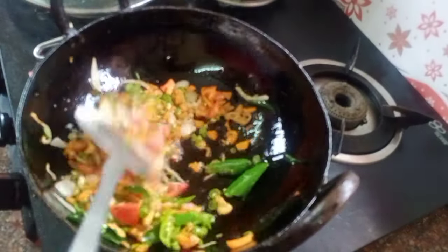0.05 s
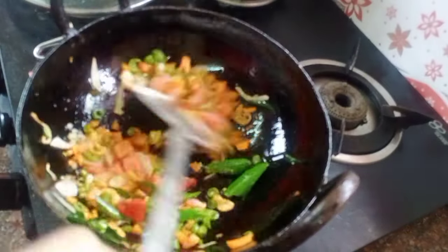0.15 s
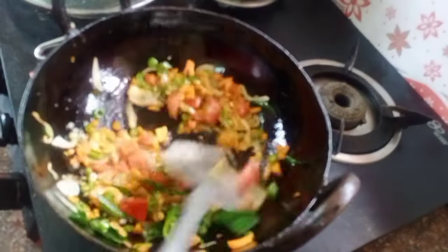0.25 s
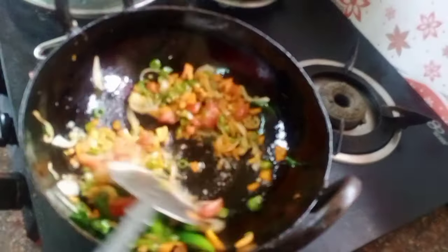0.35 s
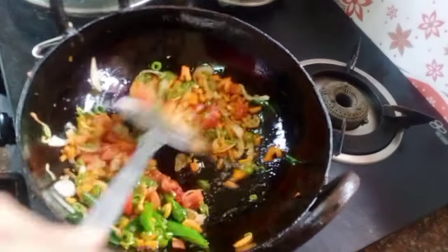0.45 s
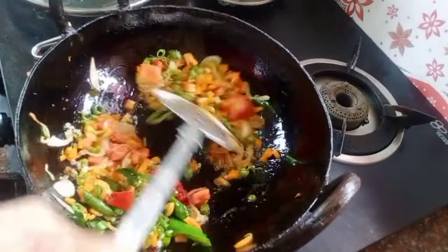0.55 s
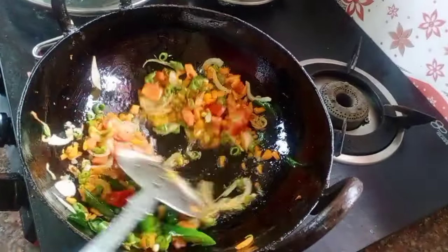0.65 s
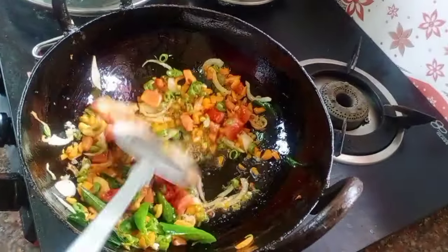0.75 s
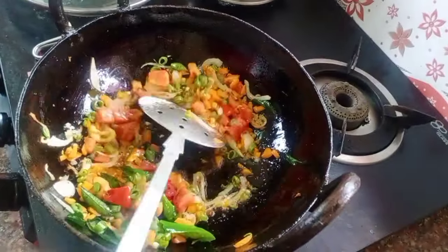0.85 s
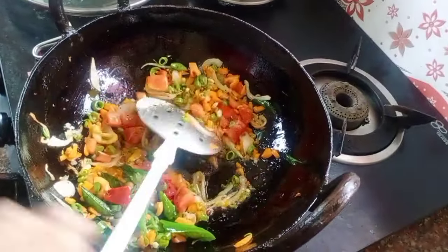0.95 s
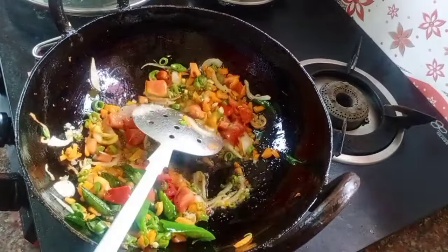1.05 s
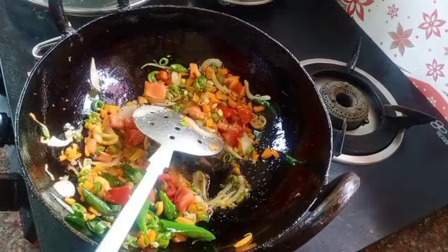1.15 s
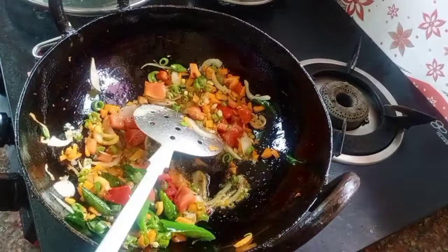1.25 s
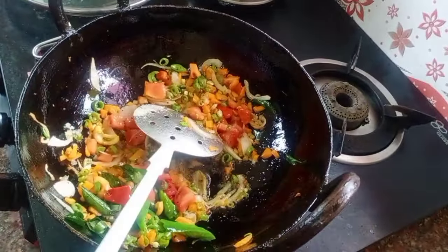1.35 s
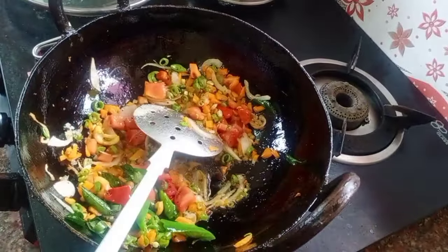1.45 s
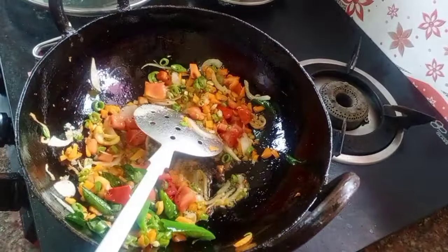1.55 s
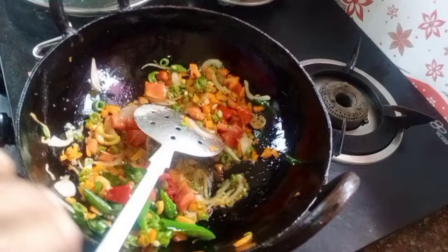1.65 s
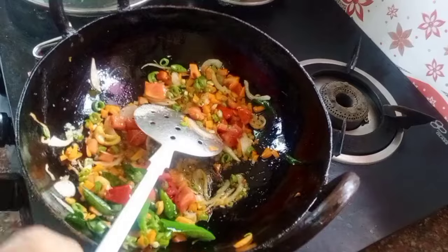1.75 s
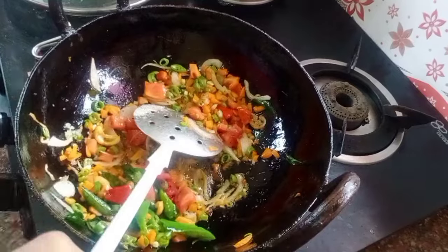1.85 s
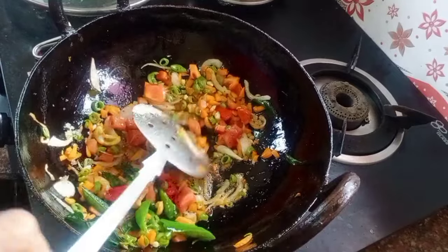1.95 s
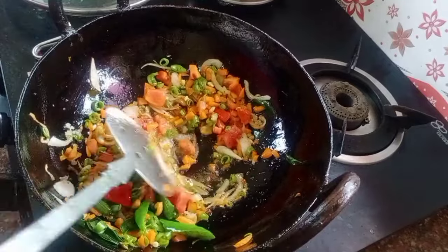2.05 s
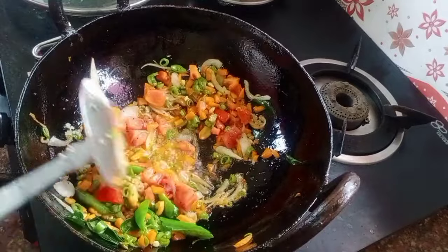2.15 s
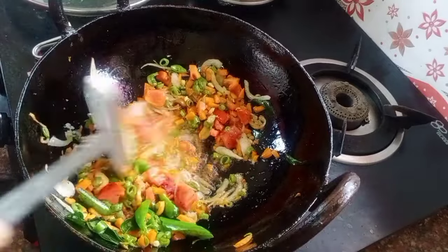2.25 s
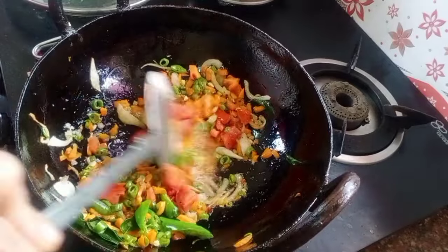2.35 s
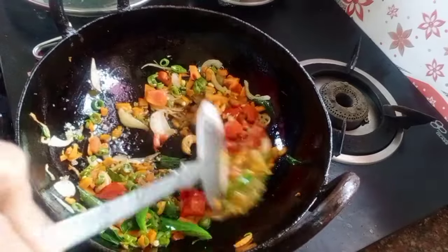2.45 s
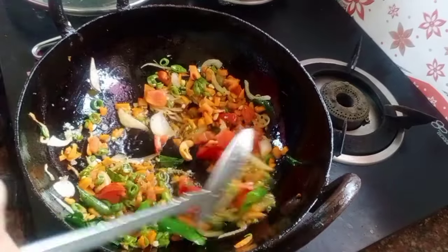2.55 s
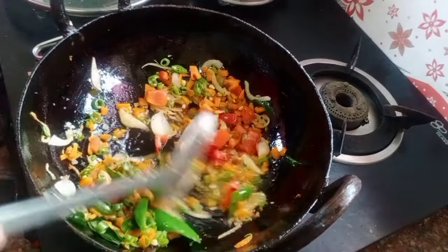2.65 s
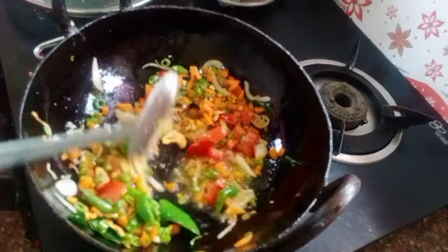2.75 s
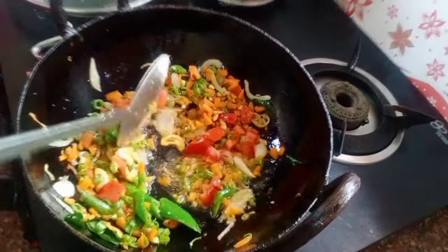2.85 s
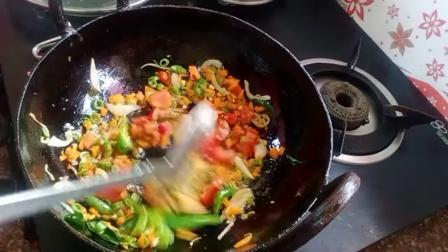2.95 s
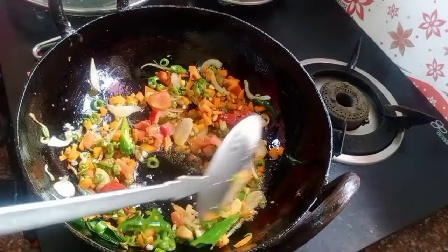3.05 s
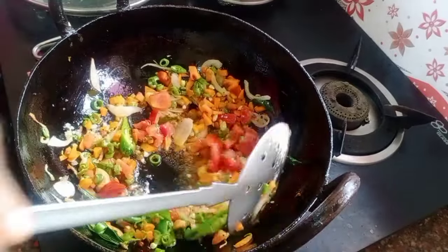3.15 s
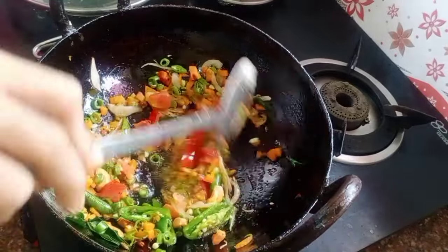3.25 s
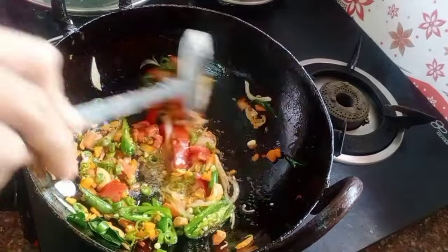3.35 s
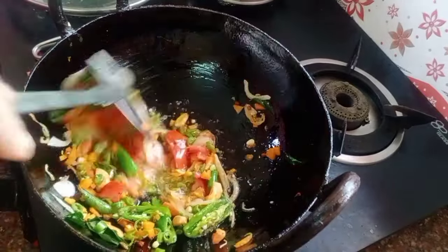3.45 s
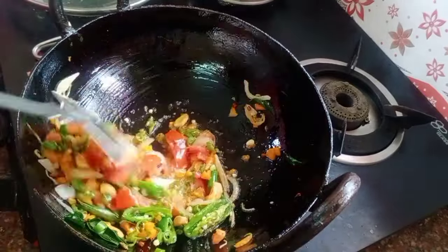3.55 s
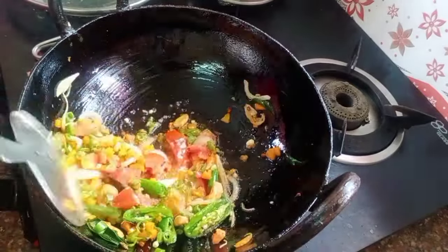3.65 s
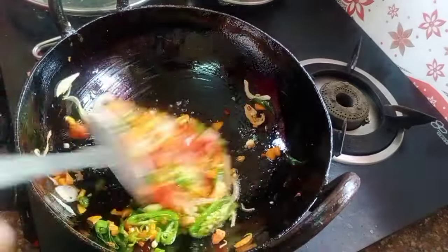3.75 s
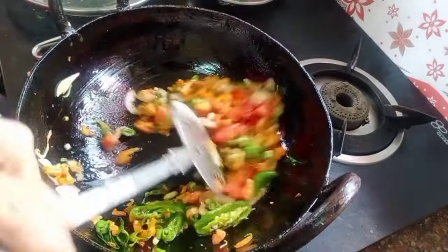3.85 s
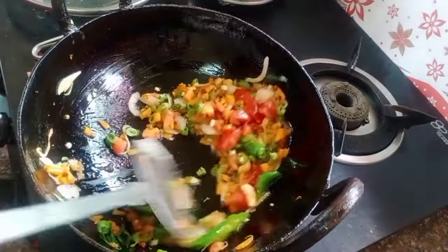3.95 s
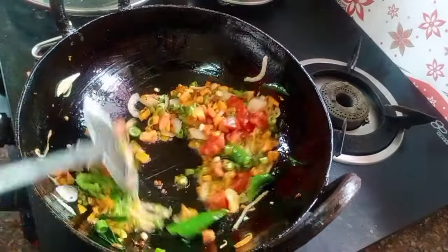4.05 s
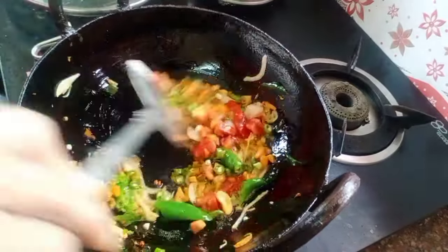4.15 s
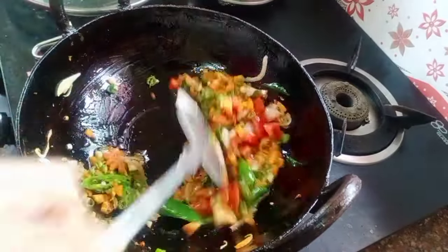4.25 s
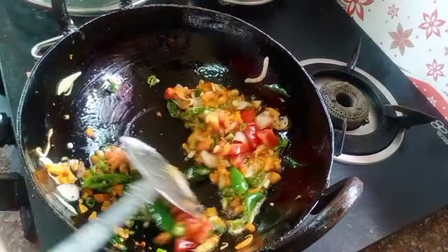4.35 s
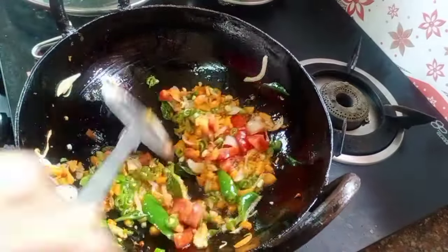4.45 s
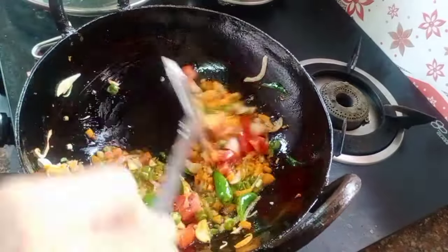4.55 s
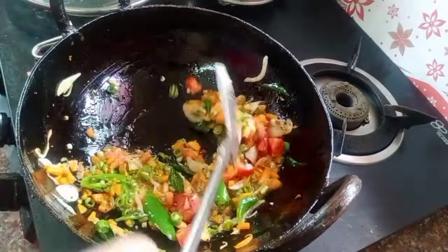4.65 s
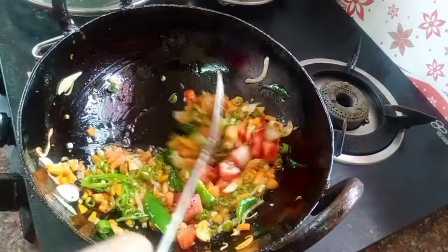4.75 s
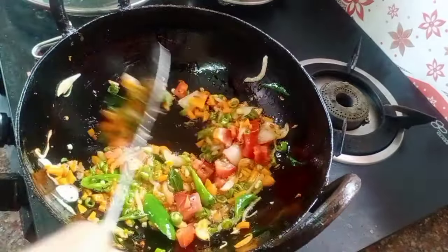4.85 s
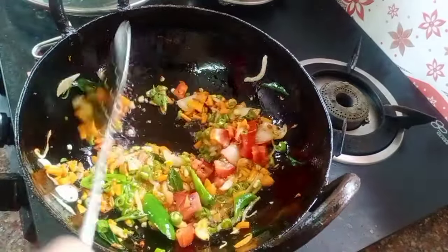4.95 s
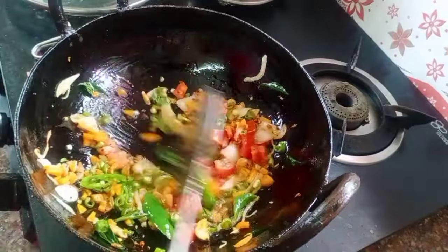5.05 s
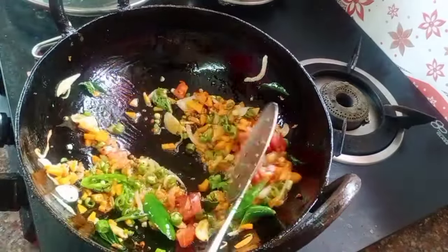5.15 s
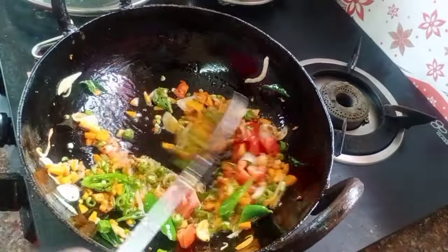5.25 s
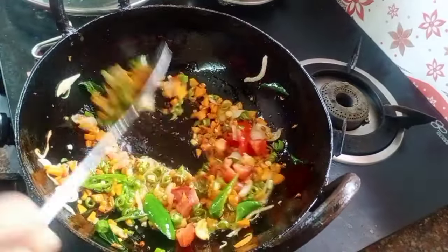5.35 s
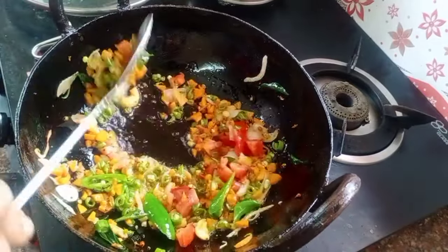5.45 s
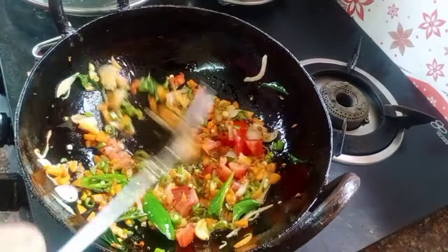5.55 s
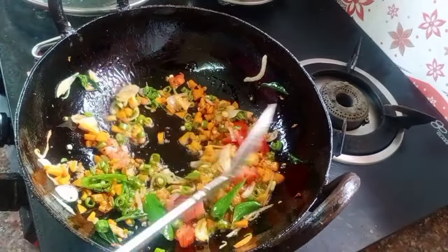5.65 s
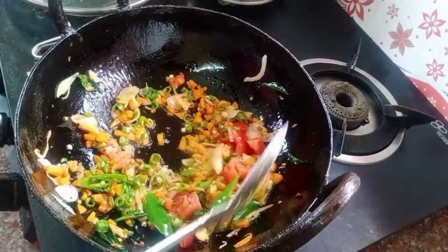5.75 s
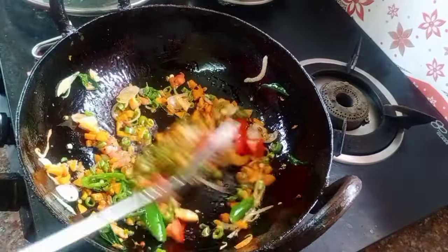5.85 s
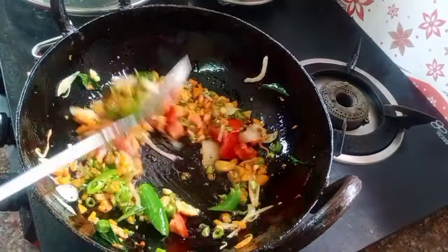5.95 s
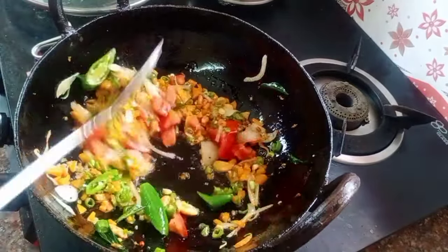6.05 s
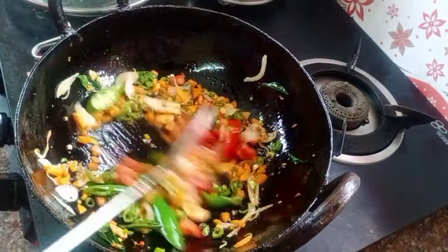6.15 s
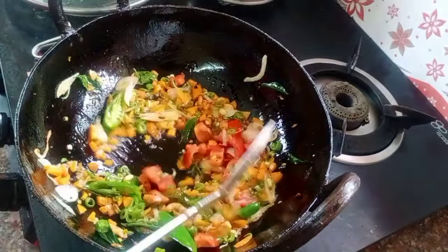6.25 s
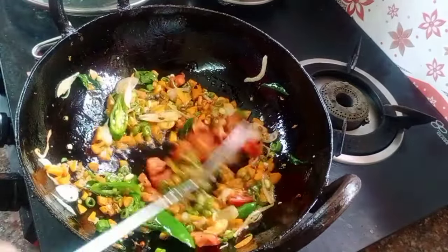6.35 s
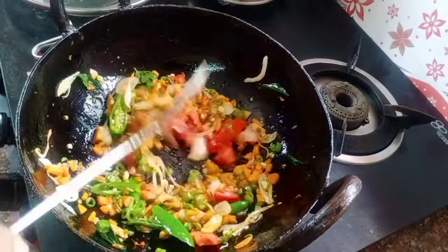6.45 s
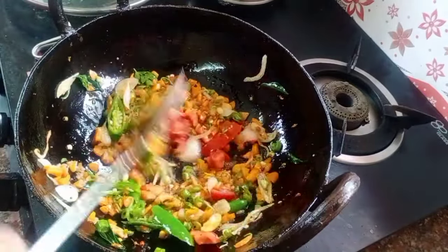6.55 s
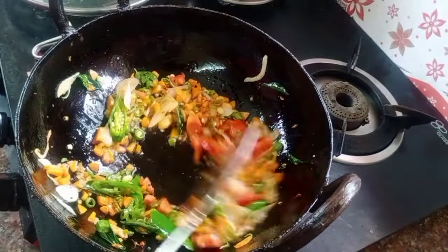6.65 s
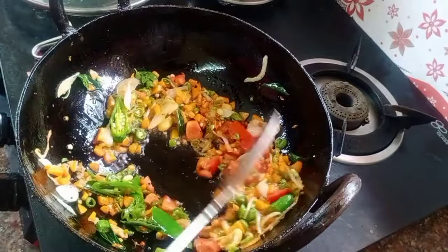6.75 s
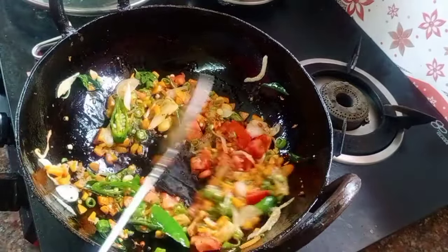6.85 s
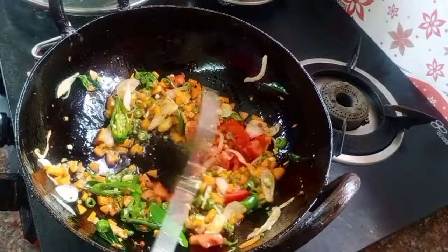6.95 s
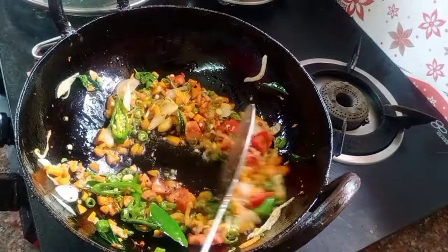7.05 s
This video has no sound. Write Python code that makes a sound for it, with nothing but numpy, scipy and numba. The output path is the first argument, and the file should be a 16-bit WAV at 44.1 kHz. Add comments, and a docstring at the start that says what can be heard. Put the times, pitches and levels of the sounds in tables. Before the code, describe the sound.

A metal spatula stirs vegetables in a heavy iron pan, heard close with a short room tail. Gritty scrapes with tiny squeals come first, followed by ringing clinks and a lull filled by steady sizzling. Then dull shoves through food, more brief rasps, hollow rubs and low soft flops follow in an uneven rhythm, with occasional oil spits and a last bright clink.

```python
"""Stirring a sizzling pan

Vegetables sizzle in an iron pan: dense random clicks for steam bursts, over a steady, noisy burner hum.
A steel spatula scrapes (stick-slip clicks through blade and bowl modes), sings in short sliding tones,
clinks (struck modes) and shoves the food (decaying grit); the pieces tumble back as soft, low thuds.
Hard kitchen walls add a short tail; a look-ahead limiter and a treble cut finish the mono mix.
"""
import sys
import numpy as np
from scipy import signal
from scipy.fft import rfft, irfft
from scipy.io import wavfile
from scipy.ndimage import uniform_filter1d, minimum_filter1d
from numba import njit

SR = 44100
rng = np.random.default_rng(int(sys.argv[2]) if len(sys.argv) > 2 else 0)


def unload_wav(signal):
    """Save mono or channel-first audio to the path in sys.argv[1] as 16-bit WAV at rate SR, clipped to [-1, 1]."""
    wavfile.write(
        sys.argv[1],
        SR,
        np.round(np.clip(np.atleast_2d(signal).T, -1, 1) * 32767).astype(np.int16),
    )


N = 312669
T = np.arange(N) / SR


def undb(db):
    """Decibels to gain."""
    return 10 ** (np.asarray(db) / 20)


def unit(x):
    """Scale to rms 1."""
    return x / np.sqrt(np.mean(x ** 2))


def unit_energy(x):
    """Scale to energy 1; such a response passes white noise at gain 1."""
    return x / np.sqrt(np.sum(x ** 2))


def curve(rows):
    """Gain over time from (time_s, level_db) rows."""
    return undb(np.interp(T, *np.transpose(rows)))


def through(x, response):
    """Convolve and keep the length."""
    return signal.fftconvolve(x, response)[:len(x)]


def add(out, start_s, x):
    """Mix x into out at a start time."""
    i = max(int(start_s * SR), 0)
    out[i:i + len(x)] += x[:N - i]


def colour(points, size=16384):
    """Minimum-phase impulse response with a given (freq_hz, level_db) spectrum."""
    hz, db = np.transpose(points)
    bin_hz = np.arange(size // 2 + 1) * SR / size
    log_gain = np.log(undb(np.interp(np.log(bin_hz + 1), np.log(hz), db)))
    # folding the cepstrum puts the energy at the front of the response
    cepstrum = irfft(log_gain)
    cepstrum[1:size // 2] *= 2
    cepstrum[size // 2 + 1:] = 0
    return unit_energy(irfft(np.exp(rfft(cepstrum))))


def band(x, hz, width_hz):
    """One resonance, gain 1 at its centre."""
    centre_hz = min(hz, SR / 3)
    q = hz / min(width_hz, SR / 3)
    return signal.lfilter(*signal.iirpeak(centre_hz, q, fs=SR), x)


@njit
def sweep(x, hz, width):
    """State-variable band-pass whose centre moves every sample."""
    y, b, low = np.empty(len(x)), 0., 0.
    for i in range(len(x)):
        g, k = np.tan(np.pi * hz[i] / SR), width / hz[i]
        v = (b + g * (x[i] - low)) / (1 + g * (g + k))
        b, low, y[i] = 2 * v - b, low + 2 * g * v, k * v
    return y


def walk(rate):
    """Smooth random drift at rms 1, with rate new targets a second."""
    k = max(int(SR / rate), 2)
    steps = np.repeat(rng.standard_normal(N // k + 1), k)
    return unit(uniform_filter1d(steps, k)[:N])


def wandering(count, rate):
    """Equal-power shares of a source that drifts between several places."""
    shares = undb(6 * np.array([walk(rate) for _ in range(count)]))
    return shares / np.sqrt(np.sum(shares ** 2, axis=0))


def clicks(rate, spread_db, size=N):
    """Random impulses of either sign, rate a second on average, whose sizes scatter by spread_db."""
    sizes = undb(spread_db * np.minimum(rng.standard_normal(size), 2.7))
    return (rng.random(size) < rate / SR) * sizes * rng.choice([-1, 1], size)


def gesture(start, length, attack, release):
    """Envelope of one movement: it builds, holds to the end of its length and dies away."""
    rise = np.clip((T - start) / attack, 0, 1)
    return rise * np.exp(-np.clip((T - start - length) / release, 0, 30))


def ringing(modes, scatter_db=0.35, size=16384):
    """Decaying modes; random strength and slight detuning stand for the point of contact."""
    t = np.arange(size) / SR
    ring = 0
    for hz, db, t60 in modes:
        strength, shift, phase = rng.standard_normal(3)
        cycles = hz * (1 + .001 * shift) * t + phase
        decay = undb(db + scatter_db * strength - 60 * t / t60)
        ring = ring + decay * np.sin(2 * np.pi * cycles)
    return unit_energy(ring)


def metal(modes, points, ring_db):
    """Response of a metal part: a crack of dense, quickly damped vibration, then its modes."""
    return unit_energy(colour(points) + undb(ring_db) * ringing(modes))


def bubbles(lo_hz, hi_hz, rate, cycles, spread_db, count):
    """Sparse pops, each ringing for some cycles at the pitch of its cavity."""
    pitches = np.geomspace(lo_hz, hi_hz, num=count) * (1 + 0.02 * rng.standard_normal(count))
    pops = [band(clicks(rate, spread_db), hz, hz / cycles) / np.sqrt(hz) for hz in pitches]
    return unit(sum(pops))


def pan_wall(x):
    """The wall of the pan reflects the low mids; the path changes as the food moves, shifting their colour."""
    delay_s = .00142 * (1 + .06 * walk(rate=5))
    low_mids = band(x, hz=1800, width_hz=1900)
    return x + undb(-6) * np.interp(T - delay_s, T, low_mids)


# how hard the oil fries, as a relative level: time_s, level_db
FRYING_LEVEL = [(0.0, -30), (0.12, -28), (0.35, -26.5), (0.53, -26.5), (1.95, -31.5), (2.23, -31.5),
                (2.84, -28.5), (3.77, -30.5), (4.32, -29), (4.54, -32), (4.8, -31.5), (5.35, -29),
                (5.63, -31.5), (6.02, -29.5), (7.01, -31), (7.09, -32)]
# spectrum of the bursting steam: freq_hz, level_db (per Hz)
STEAM_COLOUR = [(300, -27), (650, -29), (1100, -24), (1450, -13), (2200, -12.5), (3000, -5.5), (3900, -.5),
                (5200, -1), (7000, 0), (8200, -11), (9300, -21.5), (11300, -18), (13000, -7), (15000, 0)]
# single spits of oil, relative strength: start_s, level_db
OIL_SPITS = [(0.101, -6), (0.5344, -9), (2.159, -10), (2.452, -4), (2.6315, -1), (3.514, -15), (4.9552, -8),
             (5.184, -2), (5.48, -2)]


def sizzle(level_db=2.5, spit_db=3, spit_decay_s=0.00055):
    """Steam bursts in the oil: flurries of clicks, crackle, sharp ticks, fizzing and simmering bubbles."""
    bursts = unit(clicks(rate=3600, spread_db=-0.5)) * undb(0.66 * walk(130))
    crackle = undb(-8) * unit(clicks(rate=70, spread_db=3))
    fizz = undb(-9) * bubbles(3300, 9200, rate=77, cycles=3.8, spread_db=-1.0, count=6)
    simmer = undb(-15) * bubbles(1300, 3200, rate=7, cycles=25, spread_db=4, count=12)
    ticks = undb(-12) * unit(band(clicks(rate=45, spread_db=4.5), hz=14500, width_hz=3500))
    oil = unit(bursts + crackle + ticks + fizz + simmer) * curve(FRYING_LEVEL) * undb(level_db)
    t = np.arange(256) / SR
    for start_s, db in OIL_SPITS:
        spit = rng.standard_normal(len(t)) * np.exp(-t / spit_decay_s)
        add(oil, start_s, undb(db + spit_db) * unit_energy(spit))
    return pan_wall(through(oil, colour(STEAM_COLOUR)))


# spectrum of the burner and the kitchen: freq_hz, level_db (per Hz)
BURNER_SPECTRUM = [(25, -24), (65, 6), (100, 23), (200, -17), (400, -34), (800, -26), (2000, 4)]


def burner(level_db=-61):
    """Steady noise with a strong low hum: the burner and the kitchen."""
    return undb(level_db) * through(rng.standard_normal(N), colour(BURNER_SPECTRUM))


# strokes of the blade over the iron, levels relative:
# start_s, push_s, bowl_rub_db, edge_bite_db, bowl_resonance_hz
BLADE_STROKES = [(0.07, 0.18, -39.5, -33, 880), (0.255, 0.049, -30, -25.5, 1190),
                 (0.373, 0.11, -28.5, -23, 1050), (0.52, 0.13, -36.5, -30, 980),
                 (0.704, 0.06, -39.5, -24, 970), (0.765, 0.064, -31, -44, 950),
                 (0.96, 0.16, -32, -35, 1280), (1.11, 0.038, -44, -29.5, 1130),
                 (1.904, 0.051, -45.5, -33, 1100), (2.262, 0.066, -38.5, -50, 1230),
                 (2.57, 0.055, -47, -38, 610), (2.783, 0.024, -35, -44, 1060),
                 (2.844, 0.036, -26, -27.5, 560), (2.937, 0.078, -28.5, -34, 1040),
                 (3.161, 0.08, -34, -34, 600), (3.401, 0.055, -32, -35, 845), (3.66, 0.18, -52, -42, 910),
                 (3.849, 0.078, -39, -40, 900), (3.918, 0.033, -31, -26.5, 1030),
                 (4.04, 0.036, -41, -48, 900), (4.107, 0.025, -28.5, -22.5, 800),
                 (4.19, 0.079, -40.5, -51, 780), (4.291, 0.045, -33.5, -24, 1120),
                 (4.39, 0.033, -38, -25.5, 1200), (4.429, 0.049, -30.5, -23.5, 850),
                 (4.722, 0.023, -43.5, -44, 1100), (4.96, 0.047, -41.5, -33.5, 1190),
                 (5.226, 0.042, -32, -24.5, 940), (5.34, 0.054, -40.5, -49, 716),
                 (5.506, 0.023, -39, -25, 1080), (5.779, 0.051, -40, -29.5, 950),
                 (5.975, 0.1, -44, -39, 1130), (6.263, 0.034, -47, -31.5, 800),
                 (6.53, 0.045, -46, -31.5, 760), (6.91, 0.056, -40, -27, 620)]
RUB_ATTACK_S, RUB_RELEASE_S = 0.0079, 0.044  # the bowl sounds on as the blade eases off
BITE_ATTACK_S, BITE_RELEASE_S = 0.006, 0.028  # the edge digs in and lets go a little sooner
RESTING_DB = -67.5  # light rub of the blade beneath the strokes


def pushes():
    """Gains of rub and bite, and the bowl's resonance, drawn to where the strongest stroke presses."""
    resting = undb(RESTING_DB) ** 2
    mean_hz = np.mean([row[-1] for row in BLADE_STROKES])
    rub, bite, place = resting, 0, resting * mean_hz  # powers, and the power-weighted pitch
    for start_s, push_s, rub_db, bite_db, hz in BLADE_STROKES:
        power = (undb(rub_db) * gesture(start_s, push_s, RUB_ATTACK_S, RUB_RELEASE_S)) ** 2
        rub, place = rub + power, place + power * hz
        bite = bite + (undb(bite_db) * gesture(start_s, push_s, BITE_ATTACK_S, BITE_RELEASE_S)) ** 2
    uneven = undb(1.0 * walk(35))  # the blade rides over pieces of food
    return np.sqrt(rub) * uneven, np.sqrt(bite) * uneven, place / rub


def slipping(rate, judder_hz, judder_db):
    """Stick-slip clicks in uneven bursts."""
    return clicks(rate, 0.99) * undb(judder_db * walk(judder_hz))


def friction(modes, points, ring_db, rate, judder_hz, judder_db, count=3):
    """Slips shake a metal part; pressure shortens the rings, and the contact point wanders."""
    pressed = [(hz, db, t60 * .4) for hz, db, t60 in modes]
    slips = slipping(rate, judder_hz, judder_db)
    places = wandering(count, rate=18)
    return unit(sum(through(slips * share, metal(pressed, points, ring_db)) for share in places))


# modes of the blade gripped and pressed on the iron: freq_hz, level_db, t60_s
GRIPPED_BLADE_MODES = [(2080, -13, .03), (2500, -12, .025), (3085, -2, 0.07), (3700, -3, 0.06),
                       (3805, 0, .07), (3980, -2, 0.05), (4270, -7, .03), (4690, -2, 0.07),
                       (5280, -4, 0.025), (5780, -3, 0.035), (6170, -3, 0.03), (6710, -5, 0.025)]
# dense, quickly damped vibration of the blade: freq_hz, level_db (per Hz)
BLADE_SPECTRUM = [(900, -19), (1900, -15), (2600, -1.5), (3200, -6.5), (3900, -5), (4900, -1), (6100, 5.5),
                  (7300, 3.5), (9200, -12), (11500, -13), (15000, 5)]
# as the edge rolls: scatter of mode pitch (share) and strength (dB), changes a second
ROLL_DETUNE, ROLL_DB, ROLL_PER_S = 0.005, 2.2, 30


def rasping(oiled_hz=8000, ring_db=4.5):
    """Gritty slips ring the pressed blade; its modes shift and trade strength as the edge rolls."""
    slips = slipping(rate=2000, judder_hz=190, judder_db=2.8)
    oiled = signal.butter(3, min(oiled_hz, SR / 3), fs=SR, output="sos")
    grit = signal.sosfilt(oiled, through(slips, colour(BLADE_SPECTRUM)))
    ring = 0
    for hz, db, t60 in GRIPPED_BLADE_MODES:
        centre_hz = hz * (1 + ROLL_DETUNE * walk(ROLL_PER_S))
        width_hz = float(np.log(1000) / np.pi / t60)  # bandwidth that decays 60 dB in t60
        mode = sweep(slips, centre_hz, width_hz)
        ring = ring + unit(mode) * undb(db + ROLL_DB * walk(ROLL_PER_S))
    return unit(unit(grit) + undb(ring_db) * unit(ring))


# modes of the freely ringing iron bowl: freq_hz, level_db, t60_s
BOWL_MODES = [(417, -9, .15), (448, -3.5, 0.3), (560, -1, .06), (650, 1, .06), (719, 0, 0.2),
              (866, 4.5, 0.11), (940, 3, 0.05), (1013, 1, 0.13), (1190, 0, 0.08), (1315, -3, 0.25),
              (1549, -8, 0.15)]
# dense, quickly damped vibration of the bowl: freq_hz, level_db (per Hz)
BOWL_SPECTRUM = [(120, -25.5), (330, -14), (460, -1.5), (680, -0.5), (900, 0.5), (1350, 2.5), (1800, -0.5),
                 (2600, -1), (5000, -15)]


def scraping(edge_db=-0.5, hollow_width_hz=750, wander=0.15):
    """The edge rasps brightly where it bites; the bowl answers each drag with a hollow, shifting rub."""
    drag, bite, hollow_hz = pushes()
    rub = friction(BOWL_MODES, BOWL_SPECTRUM, ring_db=-3, rate=900, judder_hz=68.6, judder_db=2.0)
    centre_hz = hollow_hz * np.exp(wander * walk(30))
    bowl = unit(sweep(rub, centre_hz, float(hollow_width_hz)))
    return undb(edge_db) * rasping() * bite + bowl * drag


# heaps of food falling over, levels relative: start_s, length_s, patter_db, pan_rocking_db
FOOD_FLOPS = [(0.314, 0.18, -41, -51), (0.824, 0.035, -40, -52), (0.93, 0.19, -44.5, -55.5),
              (1.597, 0.15, -48, -62.5), (2.239, 0.069, -47.5, -55.5), (2.813, 0.18, -39.5, -55),
              (3.195, 0.16, -53, -66), (3.409, 0.06, -39, -45), (3.517, 0.27, -61, -59.5),
              (3.942, 0.071, -45.5, -64), (4.059, 0.059, -39, -45.5), (4.304, 0.21, -48.5, -60),
              (4.45, 0.15, -50, -60), (4.756, 0.2, -54, -63), (5.017, 0.042, -48, -67),
              (5.209, 0.099, -43.5, -55), (5.37, 0.062, -48, -55), (5.526, 0.041, -50, -58),
              (5.762, 0.13, -46.5, -55.5), (5.999, 0.065, -44.5, -48.5), (6.541, 0.045, -43.5, -45.5),
              (6.919, 0.049, -43, -48)]
# spectrum of the soft food: freq_hz, level_db (per Hz)
FOOD_SPECTRUM = [(25, -35), (48, -41), (65, 1), (80, -9), (100, 11), (125, -6.5), (160, -2), (215, 4),
                 (300, 3.5), (400, -11), (700, -13), (1500, -7)]
FLOP_ATTACK_S, FLOP_RELEASE_S = 0.016, 0.027
SETTLING_DB = -73  # loose pieces shifting beneath the flops, relative like the patter


def tumbling(patter_db=1, rocking_db=5, split_hz=125, patter_hz=225, patter_width_hz=190, wander=0.24):
    """Soft pieces flop onto the iron with a dull, shifting note; heavy heaps also rock the pan."""
    patter, rocking = undb(SETTLING_DB), 0
    for start_s, length_s, pieces_db, pan_db in FOOD_FLOPS:
        fall = gesture(start_s, length_s, FLOP_ATTACK_S, FLOP_RELEASE_S)
        patter = patter + undb(pieces_db) * fall
        rocking = rocking + undb(pan_db) * fall
    thuds = through(clicks(300, 2.5), colour(FOOD_SPECTRUM))
    pieces = sweep(thuds, patter_hz * np.exp(wander * walk(25)), float(patter_width_hz))
    pan = signal.sosfilt(signal.butter(4, split_hz, fs=SR, output="sos"), thuds)
    return undb(patter_db) * unit(pieces) * patter + undb(rocking_db) * unit(pan) * rocking


# steel striking iron, levels relative: start_s, blade_db, bowl_db, blade_centre_hz, bowl_centre_hz,
# chatter_decay_s, ring_db (against the crack), grip (on the handle, 0-1)
STEEL_CLINKS = [(0.174, 0.5, -2, 5270, 990, 0.004, -4, 0.83), (0.9408, 3, -4, 6340, 1400, 0.0035, 3, 0),
                (0.9836, -1.5, -2.5, 5400, 1660, 0.0027, 7.5, 0),
                (1.0805, -8, -7, 5600, 1220, 0.0072, 7, 0.3), (1.094, -1, -5.5, 6000, 1430, 0.0096, 5, 0.4),
                (2.938, -5, 2, 2700, 1760, 0.04, -5, 1), (3.329, -5.5, -3, 5000, 940, 0.0026, -2, 0.2),
                (5.195, -4, -10, 3670, 630, 0.0044, 2.5, 0.87),
                (5.492, -4, -0.5, 5630, 1050, 0.0021, -5, 0.7),
                (5.543, -8, -28, 4020, 900, 0.0036, -5, 0.7), (5.752, -5, -18, 4360, 520, 0.008, -17, 0.7),
                (6.884, 4.5, -5, 4700, 550, 0.0023, -3.5, 0.96)]
# modes of the blade ringing freely once the handle is let go: freq_hz, level_db, t60_s
LOOSE_BLADE_MODES = [(1938, -11, 0.5), (2290, -14, 0.45), (2545, -14, 0.4), (3758, -1, 0.16),
                     (4058, -3, 0.18), (4534, 0, 0.26), (4988, -1.5, 0.1), (5560, -3, 0.1), (5635, 3, 0.15),
                     (6042, -9, 0.28), (6185, -8, 0.15), (6626, -5, 0.13)]


def clinks(blade_db=8, bowl_db=7, rattle_db=9, bowl_ring_db=-7, blade_width_hz=4500, knock_span=1.82):
    """A hard contact and a buzz of rebounds: the bowl knocks, a gripped blade rings briefly, a loose one on."""
    out, t = np.zeros(N), np.arange(16384) / SR
    contact = 1 + 2.5 * np.exp(-t / .012)  # the ring drops fast while the blade still touches the iron
    for start_s, steel_db, iron_db, steel_hz, iron_hz, chatter_s, ring_db, grip in STEEL_CLINKS:
        rebounds = clicks(12000, 1.36, size=len(t)) * np.exp(-t / chatter_s)
        push = undb(rattle_db) * unit_energy(rebounds)
        push[0] += 1  # the first contact
        crack = unit_energy(band(through(push, colour(BLADE_SPECTRUM)), steel_hz, blade_width_hz))
        gripped = grip * ringing(GRIPPED_BLADE_MODES)
        loose = (1 - grip) * contact * ringing(LOOSE_BLADE_MODES)
        blade = crack + undb(ring_db) * unit_energy(gripped + loose)
        edges_hz = [iron_hz / knock_span ** 1.5, iron_hz * knock_span]
        knock_band = signal.butter(4, edges_hz, "band", fs=SR, output="sos")
        bowl = through(push, metal(BOWL_MODES, BOWL_SPECTRUM, bowl_ring_db))
        knock = unit_energy(signal.sosfilt(knock_band, bowl))
        add(out, start_s, undb(steel_db + blade_db) * blade + undb(iron_db + bowl_db) * knock)
    return out


# shoves cushioned by food, levels relative: start_s, level_db, decay_s, centre_hz
FOOD_SHOVES = [(0.291, -30.5, 0.0071, 1110), (2.251, -27, 0.029, 480), (2.843, -19.5, 0.019, 480),
               (2.938, -18, 0.023, 1060), (2.969, -31.5, 0.081, 564)]
# damped vibration of the bowl struck through food: freq_hz, level_db (per Hz)
SHOVE_SPECTRUM = [(70, -54), (260, -8.5), (450, 9), (640, -1.5), (900, -22), (1400, 2.5), (2200, -6.5),
                  (3800, 2), (7000, -29), (10000, -46)]


def shoves(rise_s=0.0027, ring_db=-4):
    """The blade lands through the food and grinds to a stop: a dull, rough clunk."""
    out, t = np.zeros(N), np.arange(SR // 2) / SR
    for start_s, db, decay_s, hz in FOOD_SHOVES:
        envelope = (1 - np.exp(-t / rise_s)) * np.exp(-t / decay_s)
        grind = clicks(3500, 4.3, size=len(t)) * envelope
        clunk = band(through(grind, metal(BOWL_MODES, SHOVE_SPECTRUM, ring_db)), hz, 3 * hz)
        # longer shoves carry more energy
        add(out, start_s, undb(db) * unit_energy(clunk) * np.sqrt(decay_s * SR))
    return out


# short sliding tones: squeals of the scraping edge, and the last a brief ring after a clink;
# levels relative: start_s, length_s, first_hz, last_hz, level_db
SLIDING_TONES = [(0.421, 0.026, 3850, 3750, -20), (0.448, 0.029, 3760, 3790, -30),
                 (0.495, 0.024, 880, 845, -30.5), (0.696, 0.041, 3520, 3340, -27),
                 (0.723, 0.048, 3070, 3190, -29), (0.728, 0.031, 3760, 3905, -22.5),
                 (0.772, 0.064, 1157, 882, -33), (2.614, 0.019, 3700, 3680, -32),
                 (2.78, 0.042, 1110, 1010, -36), (3.393, 0.035, 1127, 945, -29.5),
                 (4.045, 0.025, 1063, 905, -32.5), (4.116, 0.04, 3790, 3830, -26.5),
                 (4.12, 0.043, 4720, 4700, -25.5), (4.295, 0.018, 1023, 980, -27.5),
                 (4.37, 0.077, 2080, 1974, -37), (4.728, 0.02, 995, 1094, -36),
                 (5.236, 0.049, 3500, 3770, -27), (5.238, .025, 946, 990, -34),
                 (5.975, 0.1, 1012, 1077, -42.5), (6.123, 0.072, 1310, 1380, -47),
                 (6.265, 0.044, 720, 744, -46.5), (6.37, 0.094, 1350, 1410, -55),
                 (6.885, 0.074, 3135, 3080, -40)]


def sliding_tones(judder_db=4):
    """Squeals of the scraping edge, and last a brief ring after a clink: sines that slide and waver."""
    out = np.zeros(N)
    drift, unsteady = walk(500), undb(judder_db * walk(220))
    for start_s, length_s, first_hz, last_hz, db in SLIDING_TONES:
        end_s = start_s + length_s
        part = slice(int(start_s * SR), int(end_s * SR))
        waver_hz = np.sqrt(first_hz)  # high tones waver over more Hz
        slide_hz = np.interp(T[part], [start_s, end_s], [first_hz, last_hz])
        hz = slide_hz + waver_hz * drift[part]
        tone = np.sin(2 * np.pi * np.cumsum(hz) / SR) * unsteady[part]
        add(out, start_s, undb(db) * unit(tone * signal.windows.tukey(len(tone), .5)))
    return out


def kitchen(x, wet_db, t60=0.28, count=4):
    """Hard walls close by return a short, dense tail, a different one from each part of the pan."""
    t = np.arange(SR // 2) / SR
    decay = undb(-60 * t / t60) * (t > .004)
    tail = 0
    for share in wandering(count, rate=8):
        tail = tail + through(x * share, unit_energy(rng.standard_normal(len(t)) * decay))
    return (x + undb(wet_db) * tail) / np.hypot(1, undb(wet_db))


def scene():
    """Oil, burner and spatula in one room, the same in both channels."""
    frying = kitchen(sizzle(), wet_db=-7.0)
    stirring = kitchen(scraping() + tumbling() + shoves() + sliding_tones(), wet_db=-4.5)
    striking = kitchen(clinks(), wet_db=-8, count=1)
    mono = frying + burner() + stirring + striking
    return np.array([mono, mono])


def record(dry, ceiling_db=-5.5, top_hz=15700):
    """A look-ahead limiter ducks just before peaks above the ceiling; a steep filter cuts the top."""
    needed = np.minimum(1, undb(ceiling_db) / (np.abs(dry[0]) + 1e-9))
    held = minimum_filter1d(needed, size=601, origin=-170)  # the window reaches further ahead than back
    gain = uniform_filter1d(held, size=120)
    top_cut = signal.ellip(12, .1, 80, top_hz, fs=SR, output="sos")
    return signal.sosfilt(top_cut, dry * gain)


dry = scene()
out = record(dry)
unload_wav(out)
```